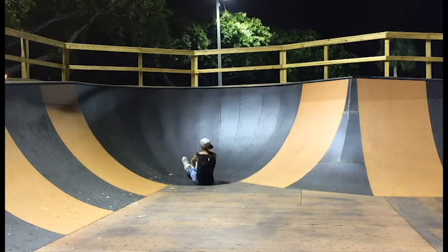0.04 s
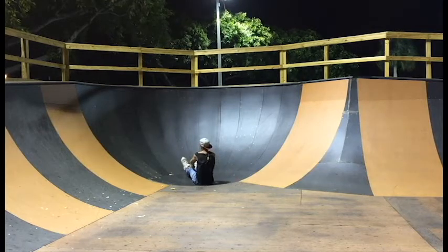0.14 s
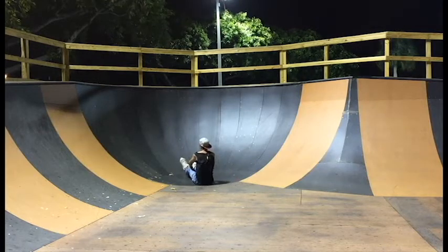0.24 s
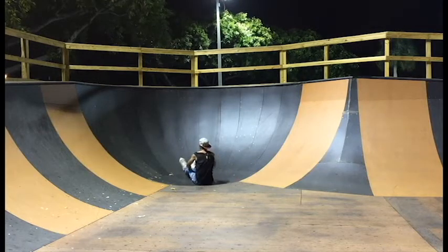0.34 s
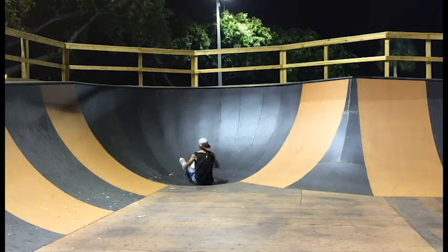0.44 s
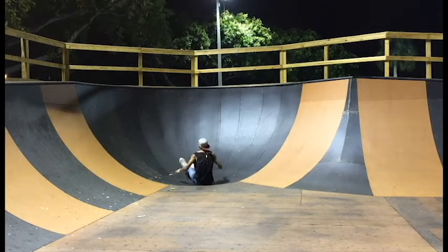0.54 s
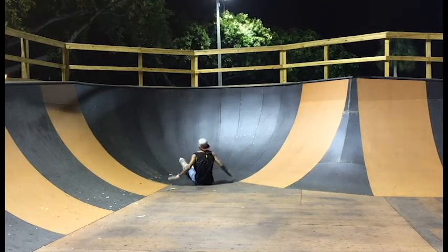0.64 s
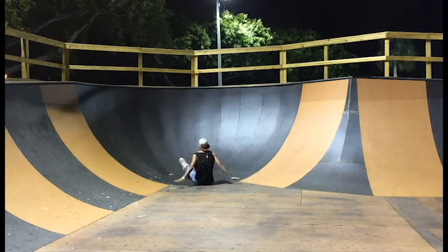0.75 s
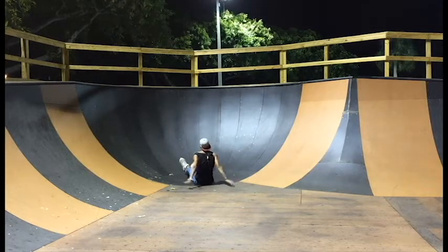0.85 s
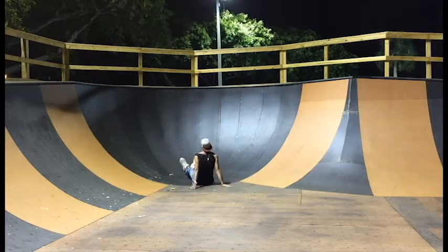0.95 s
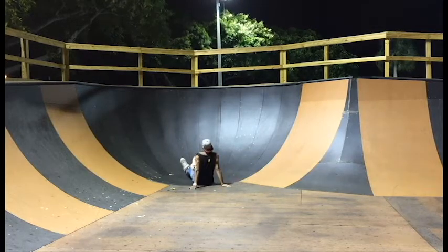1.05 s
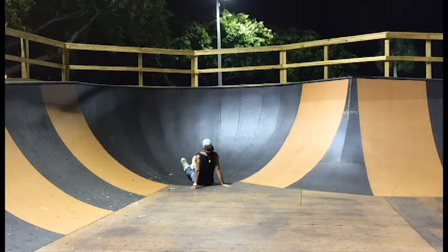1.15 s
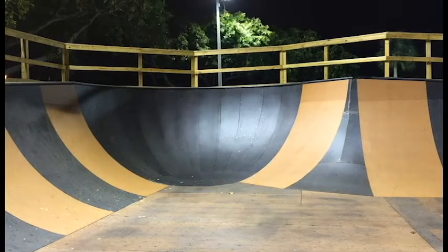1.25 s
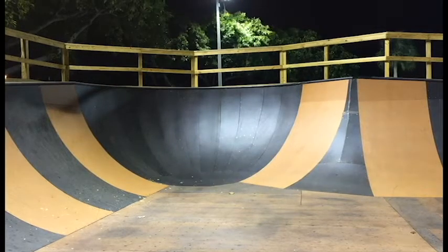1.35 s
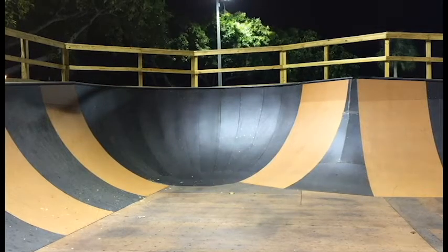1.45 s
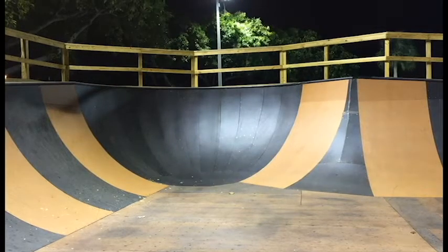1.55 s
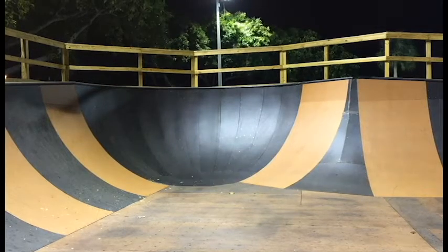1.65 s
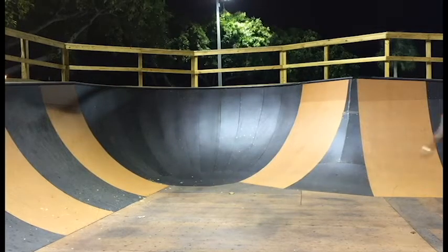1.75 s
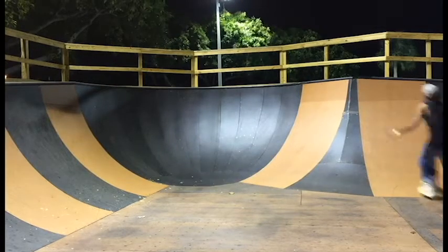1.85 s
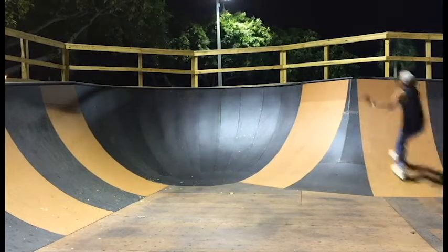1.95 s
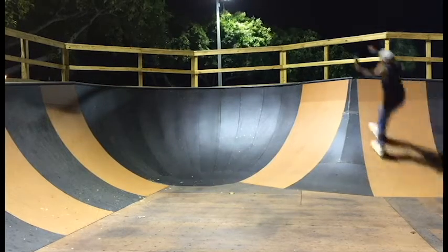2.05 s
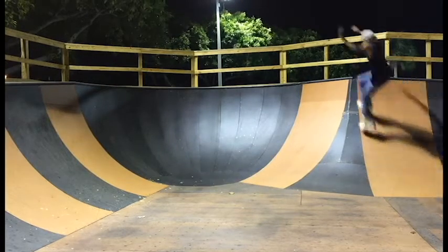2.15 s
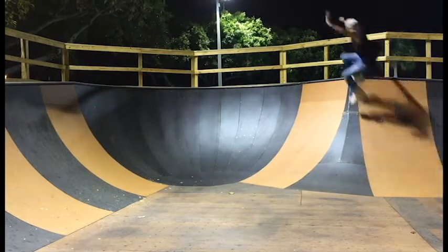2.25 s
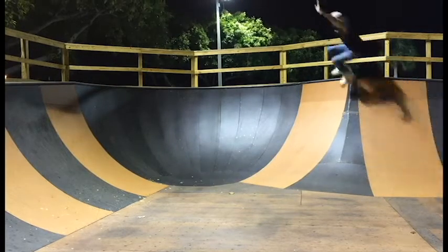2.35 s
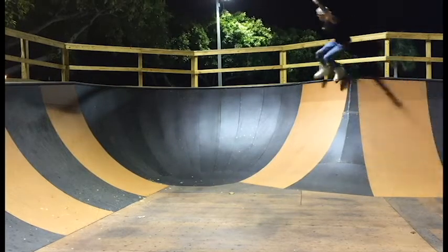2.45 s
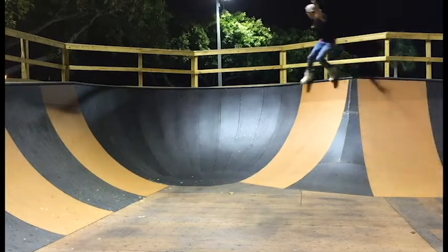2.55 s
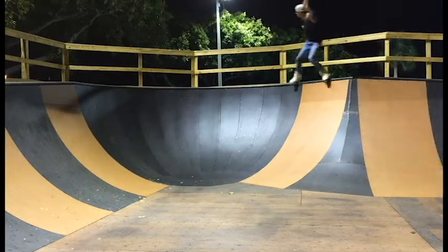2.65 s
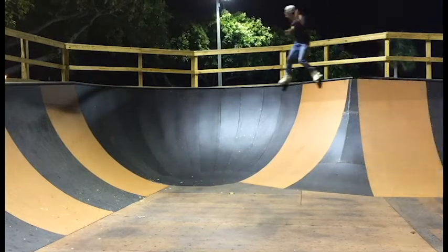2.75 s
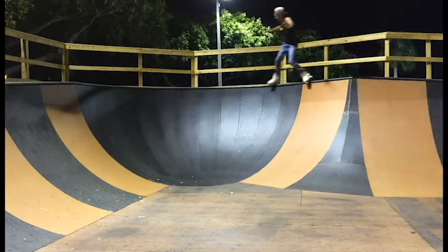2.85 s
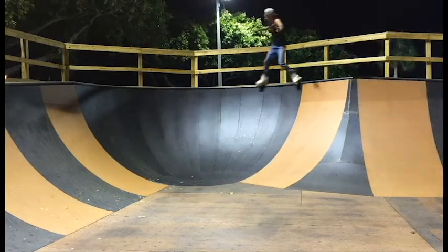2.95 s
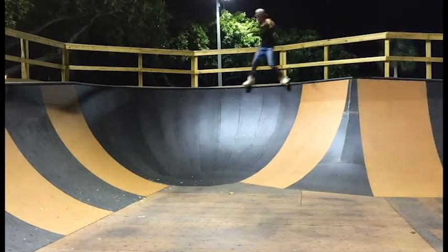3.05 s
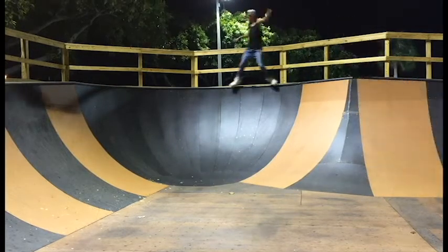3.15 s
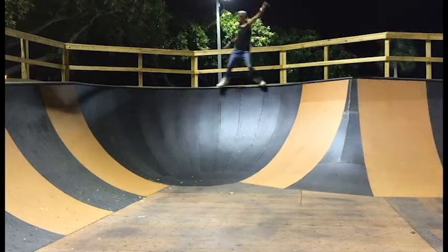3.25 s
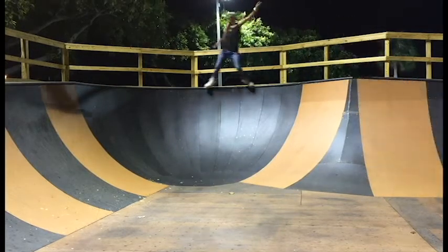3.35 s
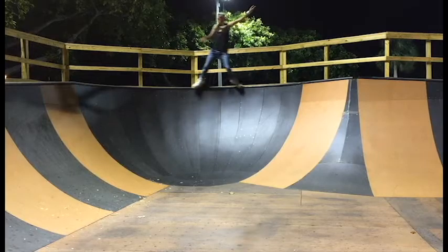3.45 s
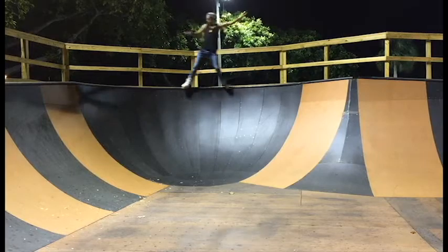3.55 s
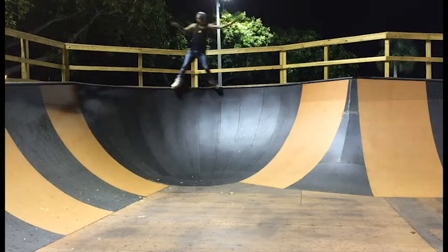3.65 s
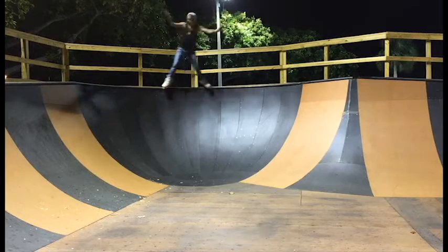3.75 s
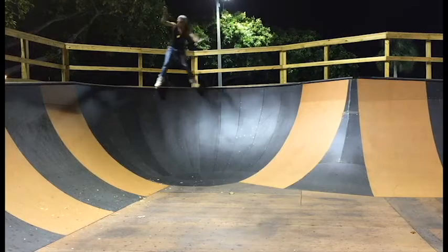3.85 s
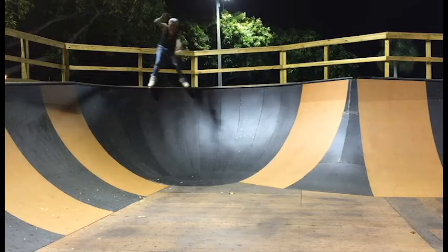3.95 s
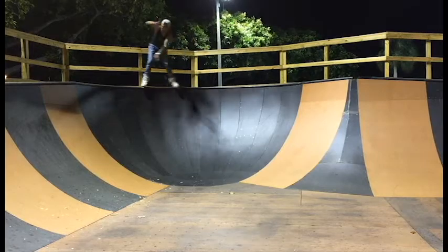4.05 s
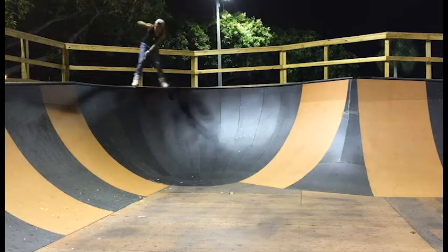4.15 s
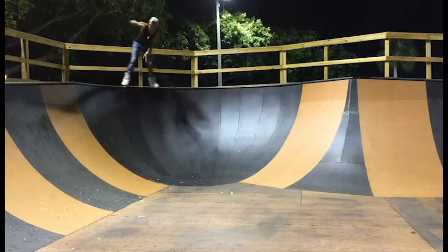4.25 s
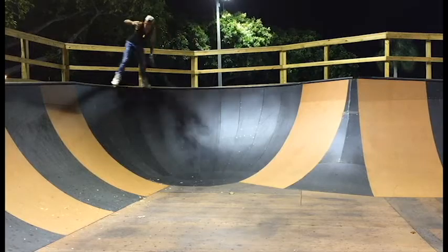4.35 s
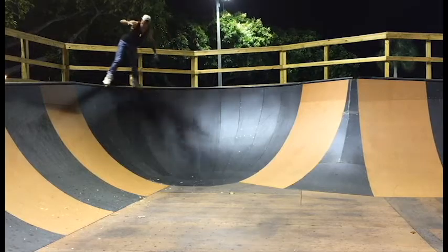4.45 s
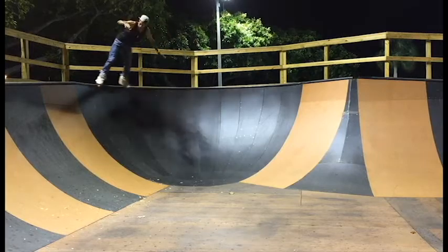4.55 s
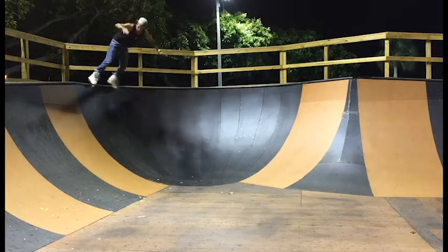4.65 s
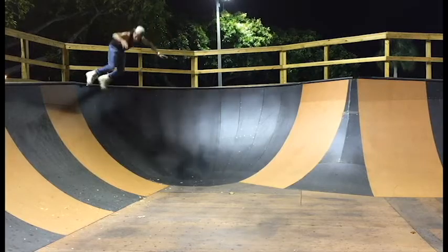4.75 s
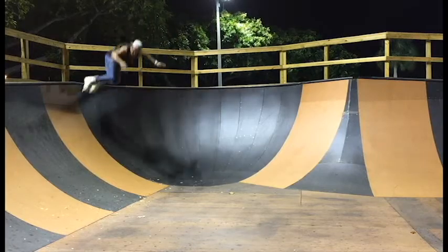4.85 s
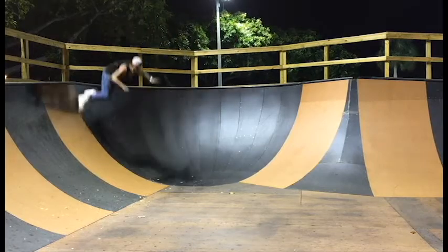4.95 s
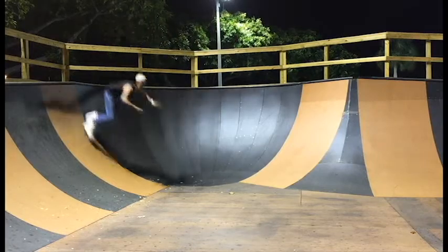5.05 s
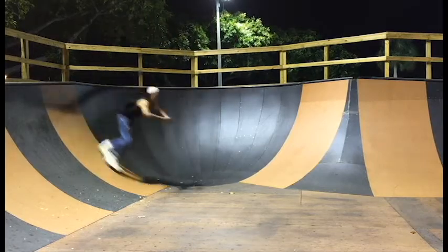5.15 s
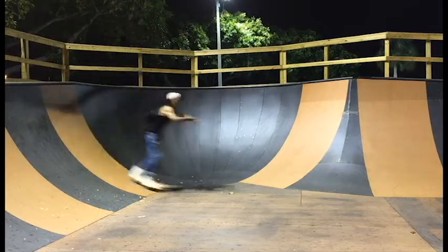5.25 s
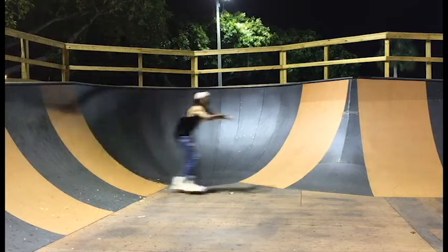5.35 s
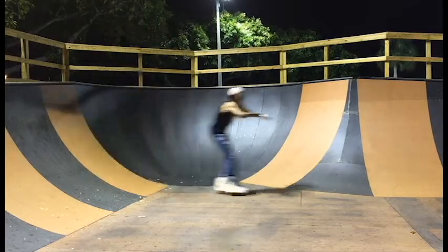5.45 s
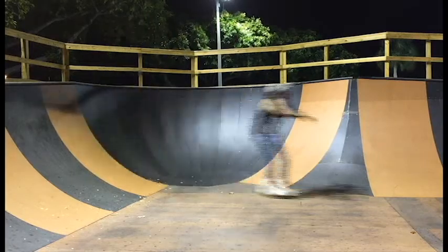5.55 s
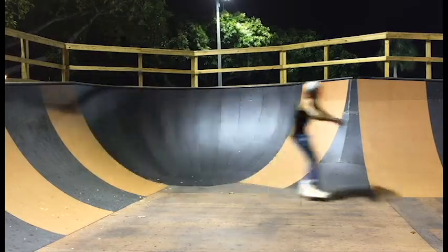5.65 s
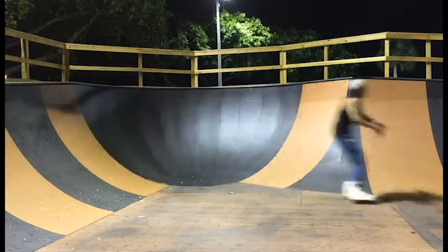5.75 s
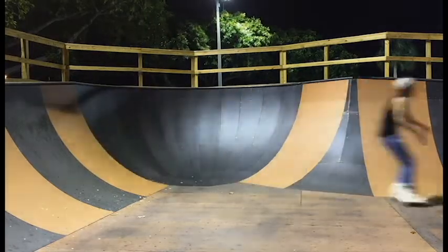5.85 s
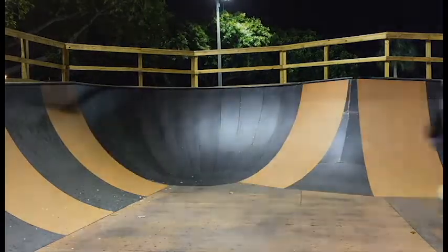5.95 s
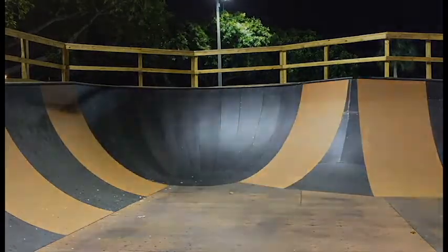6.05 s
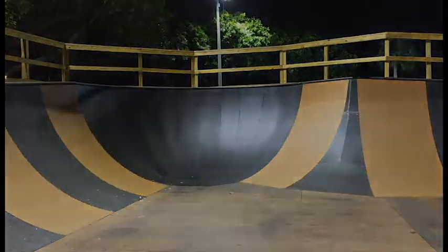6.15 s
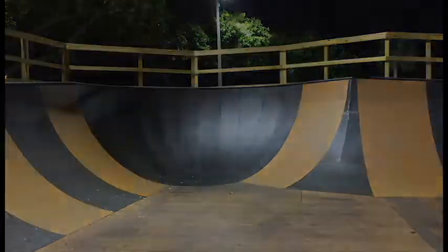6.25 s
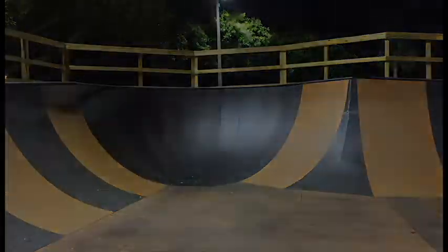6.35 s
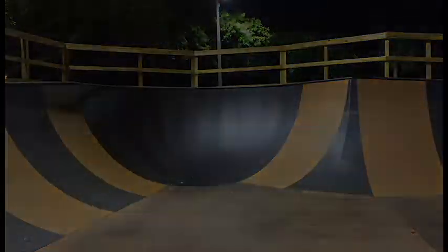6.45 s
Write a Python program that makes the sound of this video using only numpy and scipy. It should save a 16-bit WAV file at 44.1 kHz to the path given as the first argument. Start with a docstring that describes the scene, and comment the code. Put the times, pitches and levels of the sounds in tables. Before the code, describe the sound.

A quiet open-air skatepark at night, with low distant town hum and barely audible, thin insect trills. Around 1.0 s comes a small, dull tap. From 1.2 s inline skate wheels roll on hollow plywood, a low drumming rumble with gritty mid roar and hiss, joints knocking strongest near 1.4 to 1.6 s and clustering until 2.0 s. At 2.2 s the rumble drops as the skates leave the wall, wheels still spinning faintly. At 2.7 s frames crack onto the coping with a deep deck boom, then scrape and rattle along it until about 4.9 s, with scattered clacks, a scrape surge near 3.1 s and a brief high squeal at 3.66 s. At 5.15 s a hard, ringing plywood landing, the loudest knock; wheels roar and whine across the flat, knocking joints, thinning by 6.5 s. Camera microphone, short dull reflections.

```python
"""A plywood ramp at night: an inline skater runs up the wall, jumps onto the coping, rides it and drops back
in. Wheels drum on the hollow panels, sing and hiss, all as shaped noise; the coping ride scrapes and squeals
once. After a tap from a seated person's skate, joints and landings clack: frame crack, plywood knock, panel
swing. The curved wall reflects the rolling wheels with a changing lag; neighbouring ramps scatter the blows.
Insects trill in the trees as narrow wavering noise, over the hum of a distant town."""
import sys
import numpy as np
from scipy import signal
from scipy.fft import rfft, irfft, next_fast_len
from scipy.io import wavfile
from scipy.ndimage import uniform_filter1d, map_coordinates

SR = 44100
rng = np.random.default_rng(int(sys.argv[2]) if len(sys.argv) > 2 else 0)


def wav_record(signal):
    """Record a signal, one row per channel, as 16-bit PCM in the file named by sys.argv[1]."""
    frames = np.transpose(np.atleast_2d(signal))
    bounded = np.clip(frames, -1, 1)
    # unit amplitude maps onto the largest positive 16-bit level
    quanta = np.round(bounded * 32767).astype(np.int16)
    wavfile.write(sys.argv[1], SR, quanta)


N = 286893

# The distant town. Each row: frequency in Hz, relative level in dB.
TOWN_SPECTRUM = [(25, -35), (55, -0.5), (100, 1.5), (200, -8), (310, -18), (430, -24), (620, -15.5),
                 (880, -25.5), (1120, -21), (2000, -28.5), (3000, -39.5), (6200, -47), (9000, -53.5),
                 (15800, -55.5)]
TOWN_DB = -43.5  # rms
# Insects in the trees. Each row: pitch in Hz, width in Hz, rms level in dB.
INSECT_TRILLS = [(6800, 120, -80), (6980, 220, -75), (7170, 190, -71)]

# Wheels on the plywood: first a tap from a seated person's skate, then panel joints and landing.
# Each row: start in seconds, relative knock peak in dB, relative panel thud in dB, favoured knock pitch in Hz.
WHEEL_KNOCKS = [(1.016, -41.5, -35, 633), (1.195, -23.5, -25, 376), (1.426, -13.5, -21.5, 720),
                (1.574, -20.5, -21, 420), (1.609, -18.5, -17, 807), (1.759, -29.5, -24, 433),
                (1.799, -24, -21, 387), (1.849, -20.5, -19.5, 353), (1.885, -24, -24, 425),
                (1.919, -24.5, -22, 590), (2.043, -25, -22, 353), (5.141, -12, -17, 560),
                (5.153, -7.5, -10.5, 794), (5.158, -8.5, -10.5, 470), (5.282, -20, -24, 358),
                (5.47, -23, -20, 417), (5.5, -20, -13.5, 431), (5.598, -26.5, -27, 553),
                (5.695, -22, -37, 366), (5.732, -20.5, -24, 353), (6.014, -21.5, -18, 334),
                (6.099, -32, -24, 377), (6.471, -23, -29, 890)]
# Modes of a hollow panel. Each row: frequency in Hz, relative level in dB, unstretched t60 in seconds.
PANEL_MODES = [(110, -30, 0.44), (137, 1.5, 0.14), (174.2, -0.5, 0.069), (228.7, -9, 0.17),
               (314, -8.5, 0.066)]
# Plywood skin under a blow. Each row: frequency in Hz, width in Hz, relative level in dB.
PLY_RESONANCES = [(292, 73, 6), (384, 99, 4.5), (525, 113, -0.5), (647.5, 36, 6.5), (816, 38, -4),
                  (1260, 590, -11), (1507, 91, -4), (2210, 420, -14)]
# Boot and frame under a blow. Each row: frequency in Hz, relative level in dB.
FRAME_SPECTRUM = [(800, -40), (1600, -4), (2400, -2), (3400, 0), (4500, -4), (6000, -8), (8000, -17),
                  (10000, -19), (15500, -31)]
# Ringing of the plywood, then of the frames, under hard blows.
# Each row: frequency in Hz, width in Hz, relative level in dB, t60 in seconds.
PLY_RINGING = [(553, 13, 0, 0.03), (864, 140, 3, 0.017), (1620, 430, -3, 0.022), (3940, 760, -11, 0.016)]
FRAME_RINGING = [(5030, 1400, -8, 0.025), (11100, 4700, -13, 0.019)]
# Table peaks of a hard knock and a hard clack, then dB of ringing for each dB of blow.
HARD_KNOCK_DB, HARD_CLACK_DB, RING_GROWS = -7, -12.5, 1.97

# Panel rumble up the wall, out on the flat and along the deck. Each row: frequency in Hz, relative level in dB.
WALL_RUMBLE_SPECTRUM = [(15, -53), (25, -65), (64, -2), (97, -3), (196, -3), (231, -9), (520, -16),
                        (680, -46), (1140, -120)]
FLAT_RUMBLE_SPECTRUM = [(15, -53), (25, -47), (60, -10), (156, -0.5), (177, -2), (206, -6), (276, -9),
                        (374, -15.5), (419, -19), (520, -21), (680, -50), (1140, -120)]
DECK_RUMBLE_SPECTRUM = [(18, -51), (30, -63), (69, -9), (90, 3.5), (118, 1), (150, -4), (178, 6), (252, -8),
                        (324, -17), (450, -31.5), (580, -103), (990, -120)]
# Wheel roar up the wall, out on the flat and on the coping. Each row: frequency in Hz, relative level in dB.
WALL_ROAR_SPECTRUM = [(250, -20), (400, -1.5), (640, 3), (950, 0.5), (1250, 5.5), (1500, 7), (1720, 5.5),
                      (1950, -5.5), (2400, -24), (2900, -30), (4000, -50)]
FLAT_ROAR_SPECTRUM = [(250, -33), (420, 6), (640, -0.5), (950, -4.5), (1250, 5.5), (1500, 3.5), (1720, 4.5),
                      (1950, -1.5), (2400, -19), (2900, -27), (4000, -57)]
DECK_ROAR_SPECTRUM = [(250, 3.5), (430, 4.5), (750, 2), (1000, 0), (1250, 0.5), (1520, 2), (1720, 3),
                      (1950, -8), (2400, -7), (2900, -16.5), (4000, -58)]
# Tread hiss up the wall, out on the flat and along the coping. Each row: frequency in Hz, relative level in dB.
WALL_HISS_SPECTRUM = [(1500, -4), (2300, 6.5), (2800, -2.5), (3800, 4), (4700, -3), (5700, -4.5),
                      (7000, -9.5), (8300, -12.5), (9500, -13), (10800, -17), (13000, -17), (15800, -23)]
FLAT_HISS_SPECTRUM = [(1500, -32), (2300, 7), (2900, -2.5), (3700, 3.5), (4500, -2), (5600, 1), (7000, -9),
                      (8300, -11), (9900, -9.5), (10800, -11), (13000, -14.5), (15800, -23)]
DECK_HISS_SPECTRUM = [(1800, -30), (2500, 3.5), (3100, 6), (3600, 2), (4500, -6), (6000, -9), (8000, -19.5),
                      (9300, -16), (10600, -41), (15800, -22)]

# Panel rumble up the wall, along the deck and out on the flat. Each row: time in seconds, relative level in dB.
UP_RUMBLE_LEVEL = [(1.2, -27), (1.264, -20.5), (1.29, -32.5), (1.544, -27.5), (1.618, -27.5), (1.676, -31),
                   (1.784, -26.5), (1.962, -32), (2.25, -24)]
RIDE_RUMBLE_LEVEL = [(2.8, -23), (2.84, -34), (3.0, -23), (3.04, -28), (3.15, -16.5), (3.23, -26.5),
                     (3.41, -22), (3.44, -32), (3.56, -18.5), (3.85, -29.5), (3.89, -21), (4.17, -24.5),
                     (4.18, -28), (4.45, -28.5), (4.53, -18.5), (4.55, -29), (4.81, -22), (5.0, -39)]
OUT_RUMBLE_LEVEL = [(5.2, -21.5), (5.272, -29), (5.522, -18.5), (5.674, -38.5), (5.88, -26), (5.952, -34.5),
                    (6.036, -23), (6.34, -38), (6.5, -33.5)]
# Wheels on the way up, then out. Each row: time in seconds, relative roar in dB, relative tread hiss in dB.
UP_WHEEL_LEVELS = [(1.21, -37.5, -46.5), (1.404, -42, -41.5), (1.424, -43, -40), (1.456, -39.5, -42),
                   (1.774, -42.5, -47), (2.176, -37, -46.5), (2.284, -44.5, -49.5), (2.64, -45, -55.5)]
OUT_WHEEL_LEVELS = [(5.23, -46, -50), (5.334, -37, -43.5), (5.396, -35.5, -41), (5.65, -39, -50.5),
                    (6.072, -40.5, -50), (6.36, -44.5, -56), (6.45, -46, -53.5)]
# Reflection from the curved wall, its lag changing as the skates pass. Each row: time in seconds, lag in
# milliseconds.
WALL_LAG = [(1.27, .26), (1.5, .41), (1.75, .6), (2.0, .76), (2.12, .81), (2.65, .8), (5.4, .94),
            (5.72, .94), (6.3, .68), (6.5, .65)]
# The panels die away once the skates leave the wall.
TAKE_OFF_S, SETTLE_DB_PER_S = 2.233, 150

# Frames clacking down, mostly on the coping.
# Each row: start in seconds, relative crack peak in dB, relative knock in dB, relative panel thud in dB,
# ring pitch in Hz, relative ring level over the knock in dB.
FRAME_CLACKS = [(2.6728, -14, -25.5, -9, 1680, 6.5), (2.7328, -25.5, -26, -12, 1640, 0),
                (2.7772, -46, -34.5, -22, 1200, 2), (2.9078, -36, -43, -18.5, 1280, 3),
                (2.9829, -42, -39.5, -15.5, 1710, 4.5), (3.1126, -28, -32.5, -26, 1510, 1),
                (3.126, -29, -30.5, -24, 1250, 10), (3.3025, -42, -39, -21, 1590, 9),
                (3.5351, -38, -29.5, -19.5, 1470, 2.5), (3.5648, -34, -38.5, -21, 1450, 11),
                (3.8825, -39, -41, -23, 1420, 9), (3.9104, -36, -44, -16, 1510, 12),
                (3.9717, -28, -42, -27, 1460, 16), (4.026, -45, -45, -24, 1570, 14),
                (4.0556, -37, -38, -24.5, 1440, 11), (4.0907, -38, -37, -15.5, 1530, 3),
                (4.1997, -43, -40, -28, 1630, 9), (4.385, -59, -47, -22.5, 1320, 1),
                (4.4963, -34, -30.5, -18.5, 1570, 0.5), (4.6703, -32, -31.5, -22.5, 1670, -4),
                (4.7855, -49, -30, -22, 1320, -2), (4.8013, -32.5, -23.5, -26.5, 1310, -9),
                (5.1979, -26.5, -35, -22.5, 3380, 7)]
# How hard the frames scrape on the coping. Each row: time in seconds, scrape level in dB.
SCRAPE_LEVEL = [(2.76, -46.5), (2.84, -54.5), (3.07, -58.5), (3.13, -36.5), (3.15, -49), (3.41, -49.5),
                (3.67, -41), (3.79, -52), (3.99, -50.5), (4.78, -53.5), (4.8, -42), (4.86, -52.5)]
# Harder scraping is brighter: usual scrape level, then dB of roar and of song for each dB of scrape.
SCRAPE_DB, ROAR_GROWS, SONG_GROWS = -48.5, 0.58, 0.87
# A frame catches once and the coping squeals: time of the peak, half-width of the bump, boost of the song.
SQUEAL_S, SQUEAL_WIDTH_S, SQUEAL_DB = 3.662, 0.0096, 11.5
# The sliding frames chatter, so the treble surges: spread in dB, random curve knots a second.
CHATTER_DB, CHATTER_RATE = 3.2, 45
TOP_HZ = 15850  # upper limit of the camera's sound


def amp(db):
    """Decibels to gain."""
    return 10 ** (np.asarray(db) / 20)


def unit(x):
    """Scale to rms 1."""
    return x / np.sqrt(np.mean(x ** 2) + 1e-20)


def noise(count=N):
    """White noise."""
    return rng.standard_normal(count)


def clock(count=N):
    """Time in seconds of each sample."""
    return np.arange(count) / SR


def curves(rows):
    """One value per sample for each column after the time."""
    seconds, *columns = np.transpose(rows)
    return [np.interp(clock(), seconds, column) for column in columns]


def wobble(rate):
    """A smooth random curve, rate knots a second."""
    knots = noise(int(N * rate / SR) + 4)
    return map_coordinates(knots, [np.arange(N) * rate / SR])


def filtered(x, response):
    """x through a response given as a function of frequency in Hz."""
    size = next_fast_len(len(x) + SR // 4)
    hz = np.fft.rfftfreq(size, 1 / SR)
    return irfft(rfft(x, size) * response(hz), size)[:len(x)]


def coloured(x, spectrum):
    """x shaped by (Hz, dB) points on a log axis, at rms 1."""
    points_hz, points_db = np.transpose(spectrum)

    def response(hz):
        shape = amp(np.interp(np.log(hz + 1), np.log(points_hz), points_db))
        # cut an octave below the first point, roll off around an octave above the last
        return shape * (hz > points_hz[0] / 2) / (1 + (hz / points_hz[-1] / 2) ** 4)

    return unit(filtered(x, response))


def band(x, pitch_hz, width_hz):
    """x through one smooth resonance, at rms 1."""
    return unit(filtered(x, lambda hz: np.exp(-2 * ((hz - pitch_hz) / width_hz) ** 2)))


def resonances(modes):
    """The causal response of (Hz, width, dB) resonances, with alternating signs."""
    def response(f):
        total = 0
        for k, (centre, width, db) in enumerate(modes):
            damping = 1j * f * width
            total = total + (-1) ** k * amp(db) * damping / (centre * centre - f * f + damping)
        return total

    return response


def bumps(rough_db, rate):
    """The force of wheels on an uneven surface: noise that comes in short clumps."""
    return noise() * amp(rough_db * wobble(rate))


def even(x, seconds):
    """x with its slow swells evened out."""
    power = uniform_filter1d(x ** 2, max(int(seconds * SR), 1))
    return x / np.sqrt(np.abs(power) + 1e-6)


def during(start, end, fade):
    """1 between two times, with short ramps."""
    t = clock()
    return np.clip((t - start) / fade, 0, 1) * np.clip((end - t) / fade, 0, 1)


def add(out, s, sound):
    """Mix a short sound into out at time s."""
    part = out[round(s * SR):][:len(sound)]
    part += sound[:len(part)]


def night():
    """Distant town hum under narrow, wavering insect trills."""
    out = amp(TOWN_DB) * coloured(noise(), TOWN_SPECTRUM)
    for pitch, width, db in INSECT_TRILLS:
        waver = amp(3 * wobble(9) + 3 * wobble(40))
        out += amp(db) * unit(band(noise(), pitch, width) * waver)
    return out


def swing(rise_s, ring_on, tilt_db):
    """A struck panel swings in its modes; ring_on stretches decay, tilt_db is level per octave upward."""
    t = clock(SR // 3)
    modes = np.zeros(len(t))
    for hz, db, t60 in PANEL_MODES:
        # each blow varies the mode's level (dB) and tuning (fraction)
        luck, detune = rng.standard_normal(2) * [2.5, .03]
        tilt = tilt_db * np.log2(hz / PANEL_MODES[0][0])
        decay = amp(db + luck + tilt - 60 * t / (t60 * ring_on))
        modes += decay * np.sin(2 * np.pi * hz * (1 + detune) * t)
    return modes * (1 - np.exp(-(t / rise_s) ** 2))


def strike(panel, thud, knock, crack, spot_hz, knock_t60, crack_t60, rattle_db, rattle_t60, spot_db, chatter_db):
    """One blow cracks in the frame, knocks the plywood and sets the panel swinging (three levels in dB)."""
    t = clock(len(panel))

    def strength(x):
        return x / np.sqrt(np.mean(x[:SR // 50] ** 2))  # rms 1 over the first 20 ms

    # one sharp push, then the wheels chatter; the spot that is hit favours one resonance
    blow = (t == 0) + noise(len(t)) * amp(chatter_db - 60 * t / knock_t60)
    skin = strength(filtered(blow, resonances(PLY_RESONANCES)))
    spot = strength(filtered(blow, resonances([(spot_hz, 150, 0)])))
    wood = skin + amp(spot_db) * spot
    decay = amp(-60 * t / crack_t60) + amp(rattle_db - 60 * t / rattle_t60)
    snap = coloured(noise(len(t)), FRAME_SPECTRUM) * decay * (1 - np.exp(-t / 0.0021))
    return amp(thud) * strength(panel) + amp(knock) * strength(wood) + amp(crack) * strength(snap)


def rings(modes):
    """A short decaying ring: narrow noise with its swells evened out, so mainly the phase wanders."""
    t = clock(SR // 8)
    out = np.zeros(len(t))
    for hz, width, db, t60 in modes:
        tone = even(band(noise(len(t)), hz, width), seconds=0.0092)
        out += amp(db - 60 * t / t60) * tone
    return out * (1 - np.exp(-t / 0.00062))


def knocks(thud_db, knock_db, crack_db, ring_db):
    """Wheels knock dully on the plywood; hard blows make it ring."""
    out = np.zeros(N)
    for s, peak, thud, hz in WHEEL_KNOCKS:
        panel = swing(rise_s=0.0018, ring_on=0.83, tilt_db=1.5)
        blow = strike(panel, thud + thud_db, peak + knock_db, peak + crack_db, hz, knock_t60=0.045,
                      crack_t60=0.035, rattle_db=2, rattle_t60=0.098, spot_db=0, chatter_db=-20.0)
        add(out, s, blow)
        ring_level = ring_db + RING_GROWS * (peak - HARD_KNOCK_DB)
        add(out, s, amp(ring_level) * rings(PLY_RINGING))
    return out


def park(x, t60, wet_db):
    """Neighbouring ramps and railings scatter a short, dull tail."""
    t = clock(SR // 2)
    spectrum = [(60, -25), (1500, 5), (5000, -2.5), (14000, -32.0)]
    tail = coloured(noise(len(t)), spectrum) * amp(-60 * t / t60) * (t > .008)
    return x + amp(wet_db) * signal.fftconvolve(x, tail / np.linalg.norm(tail))[:N]


def rolling(low, mid, high, rumble, roar, hiss, rough_db, grit_db):
    """Wheels shake panels (low dB), ring (mid) and hiss on grit (high): returns panel and wheel sounds."""
    shaking = even(coloured(bumps(rough_db=1.5, rate=77), rumble), seconds=0.039)
    boom = coloured(shaking, [(20, 6.0), (450, 1), (900, -34)])
    wheels = amp(mid) * coloured(bumps(rough_db, rate=110), roar)
    treads = amp(high) * coloured(bumps(grit_db, rate=380), hiss)
    return amp(low) * boom, wheels + treads


def bearings(hiss_level, level_db, pitch_hz):
    """The bearings rasp thinly and flicker; they follow half the treads' dB, so they fade less."""
    flicker = amp(3 * wobble(30) + 3 * wobble(110))
    rasp = unit(band(noise(), pitch_hz, width_hz=900) * flicker)
    return amp(hiss_level / 2 + level_db) * rasp


def wall_echo(x, share, dull_hz):
    """The curved wall returns a thin, dull, inverted reflection; its notches sweep with the changing lag."""
    lag = curves(WALL_LAG)[0] * SR / 1000  # ms to samples
    returned = filtered(x, lambda hz: hz / np.hypot(hz, 1000) / (1 + (hz / dull_hz) ** 3))
    echo = map_coordinates(returned, [np.arange(N) - lag], order=3)
    return x - share * echo


def run_up(rumble_db, roar_db, hiss_db):
    """The skates climb the wall and spin on through the jump as panels and reflection die away."""
    low, = curves(UP_RUMBLE_LEVEL)
    mid, high = curves(UP_WHEEL_LEVELS)
    airborne_s = np.maximum(clock() - TAKE_OFF_S, 0)
    settling = low + rumble_db - SETTLE_DB_PER_S * airborne_s
    panels, wheels = rolling(settling, mid + roar_db, high + hiss_db, WALL_RUMBLE_SPECTRUM,
                             WALL_ROAR_SPECTRUM, WALL_HISS_SPECTRUM, rough_db=1.0, grit_db=2.0)
    swept = wall_echo(wheels, share=.72 * np.exp(-airborne_s / .3), dull_hz=9000)
    rasp = bearings(high, level_db=-36, pitch_hz=9430)
    return (panels + swept + rasp) * during(1.19, 2.685, fade=0.018)


def clacks(thud_db, knock_db, crack_db, tone_db, ring_db):
    """Frames crack down with a short pitched ring and boom the deck; hard blows ring brighter."""
    out = np.zeros(N)
    for s, peak, knock, thud, hz, over in FRAME_CLACKS:
        deck = swing(rise_s=0.0056, ring_on=1.15, tilt_db=-1)
        blow = strike(deck, thud + thud_db, knock + knock_db, peak + crack_db, spot_hz=746, knock_t60=0.079,
                      crack_t60=0.014, rattle_db=-12.5, rattle_t60=0.085, spot_db=-2.5, chatter_db=-16.5)
        add(out, s, blow)
        add(out, s, rings([(hz, 350, knock + over + tone_db, .033)]))
        ring_level = ring_db + RING_GROWS * (peak - HARD_CLACK_DB)
        add(out, s, amp(ring_level) * rings(FRAME_RINGING))
    return out


def scratches(rate, spread_db):
    """Grit caught under the frames: dense ticks of very unequal size."""
    sizes = amp(spread_db * np.clip(noise(), -2, 2))
    ticks = (rng.random(N) < rate / SR) * sizes
    decay = np.exp(-clock(SR // 100) / 0.0038)
    bursts = signal.fftconvolve(ticks, decay)[:N] * noise()
    return coloured(bursts, [(900, -2), (1500, 11.5), (2500, 3), (4000, -28), (6000, -24.5),
                             (9000, -15.0), (11000, -21), (15000, -29)])


def ride(rumble_db, roar_db, hiss_db, drone_db, song_db, grit_db, rasp_db):
    """The skates scrape along the coping, which drones and sings while the deck booms below."""
    effort = curves(SCRAPE_LEVEL)[0] - SCRAPE_DB
    body = ROAR_GROWS * effort
    treble = effort + CHATTER_DB * wobble(CHATTER_RATE)
    low = curves(RIDE_RUMBLE_LEVEL)[0] + rumble_db
    panels, wheels = rolling(low, body + roar_db, treble + hiss_db, DECK_RUMBLE_SPECTRUM,
                             DECK_ROAR_SPECTRUM, DECK_HISS_SPECTRUM, rough_db=3.0, grit_db=1.0)

    drone = amp(body + drone_db) * band(bumps(rough_db=5, rate=60), pitch_hz=1485, width_hz=330)
    drone *= during(2.64, 4.48, fade=0.3)

    squeal = SQUEAL_DB * np.exp(-((clock() - SQUEAL_S) / SQUEAL_WIDTH_S) ** 2)
    song_level = SONG_GROWS * effort + song_db + squeal + 4 * wobble(14)
    song = amp(song_level) * even(band(noise(), pitch_hz=2993, width_hz=140), seconds=0.043)
    song *= during(3.0, 4.39, fade=.25)

    grit = amp(treble + grit_db) * scratches(rate=260, spread_db=14.0)
    rasp = amp(treble + rasp_db) * band(bumps(rough_db=2.5, rate=120), pitch_hz=9100, width_hz=1150)
    coping = wheels + drone + song + grit + rasp
    return panels * during(2.68, 4.99, fade=0.03) + coping * during(2.674, 4.9, fade=0.043)


def run_out(rumble_db, roar_db, hiss_db, whine_db):
    """The skates drop in and roll out on the flat; whine, bearings and wall reflection come in together."""
    low, = curves(OUT_RUMBLE_LEVEL)
    mid, high = curves(OUT_WHEEL_LEVELS)
    panels, wheels = rolling(low + rumble_db, mid + roar_db, high + hiss_db, FLAT_RUMBLE_SPECTRUM,
                             FLAT_ROAR_SPECTRUM, FLAT_HISS_SPECTRUM, rough_db=1.14, grit_db=1.5)
    on_flat = np.clip((clock() - 5.3) / 0.16, 0, 1)
    whine = amp(mid + whine_db) * band(noise(), pitch_hz=1654, width_hz=190)
    swept = wall_echo(wheels + whine * on_flat, share=.66 * on_flat, dull_hz=9500)
    rasp = on_flat * bearings(high, level_db=-36, pitch_hz=9700)
    return (panels + swept + rasp) * during(5.15, 6.6, fade=0.0029)


def scene():
    """A seated person's tap, then the skater's whole line, in the open night air."""
    blows = knocks(thud_db=-4.5, knock_db=-12.5, crack_db=-35.5, ring_db=-13)
    blows += clacks(thud_db=-4.0, knock_db=-6, crack_db=-17.5, tone_db=1, ring_db=-16.5)
    skates = run_up(rumble_db=-1, roar_db=-0.5, hiss_db=-0.5)
    skates += ride(rumble_db=0, roar_db=-39.5, hiss_db=-54, drone_db=-42.5, song_db=-55,
                   grit_db=-51.5, rasp_db=-68.5)
    skates += run_out(rumble_db=-1, roar_db=0.0, hiss_db=-0.5, whine_db=-7.5)
    return (night() + skates + park(blows, t60=0.36, wet_db=-18.5))[None]


def record(dry):
    """The camera rounds off the highest peaks and keeps nothing above its band limit."""
    rounded = dry[0] / (1 + (dry[0] / .68) ** 6) ** (1 / 6)
    return filtered(rounded, lambda hz: hz < TOP_HZ)[None]


dry = scene()
out = record(dry)
wav_record(out)
```